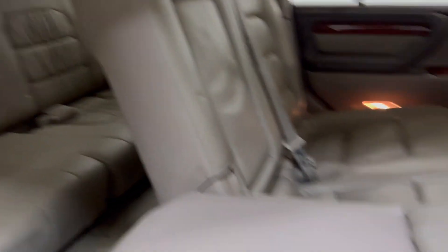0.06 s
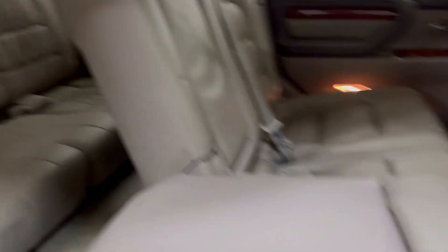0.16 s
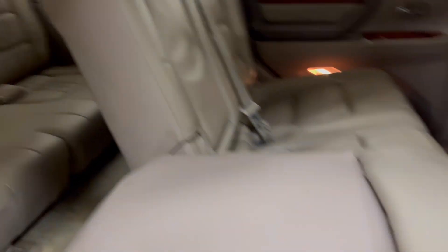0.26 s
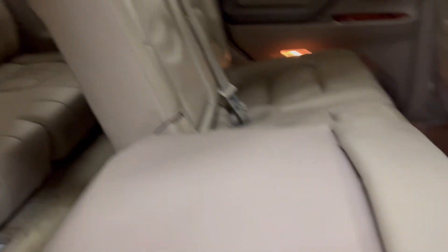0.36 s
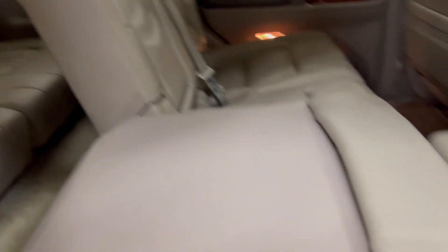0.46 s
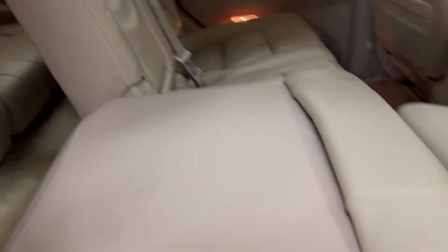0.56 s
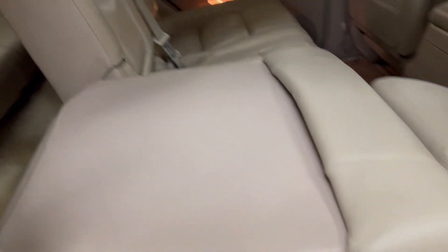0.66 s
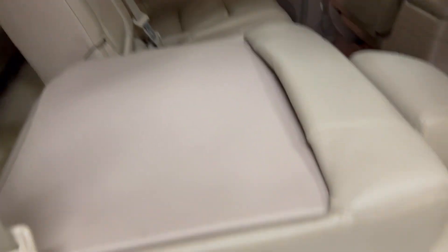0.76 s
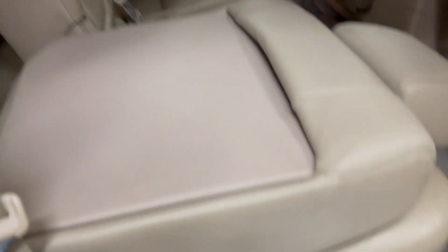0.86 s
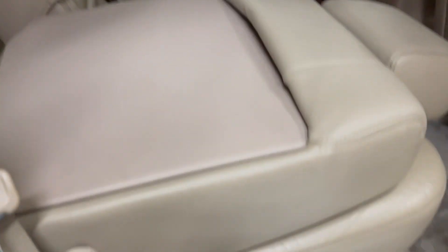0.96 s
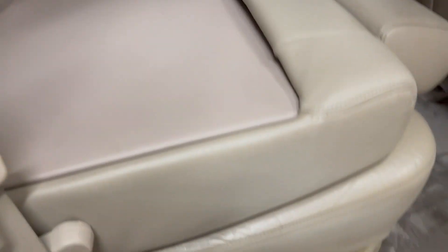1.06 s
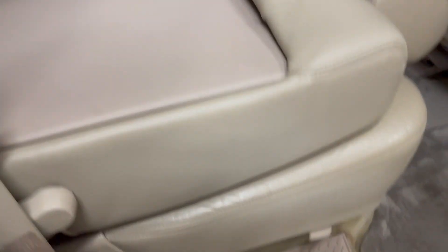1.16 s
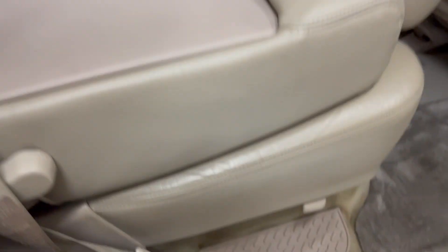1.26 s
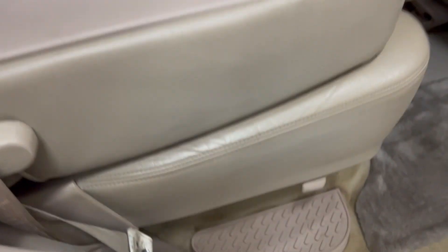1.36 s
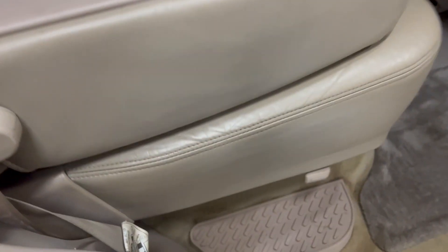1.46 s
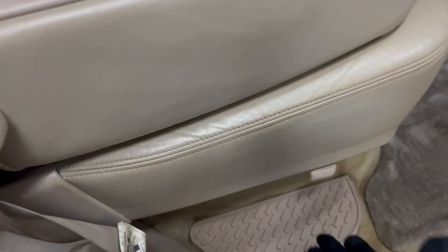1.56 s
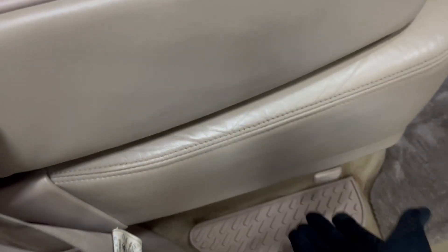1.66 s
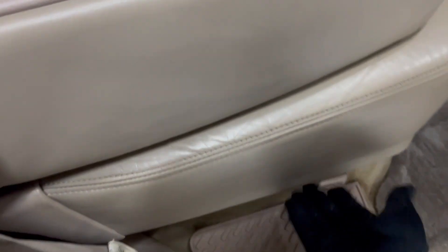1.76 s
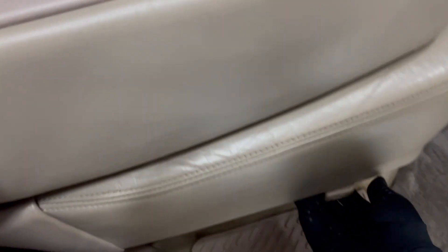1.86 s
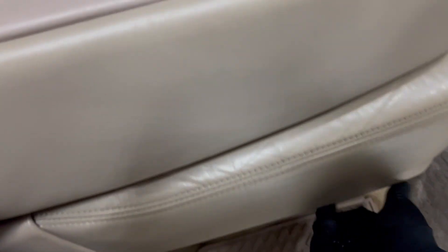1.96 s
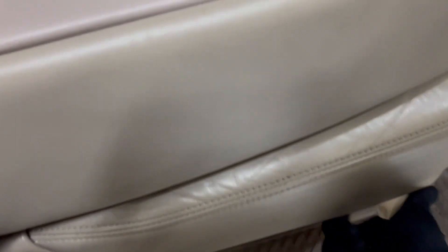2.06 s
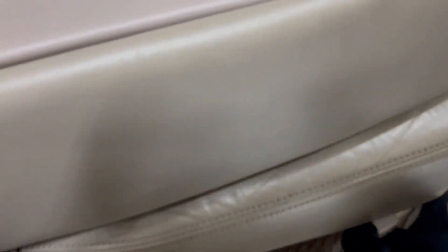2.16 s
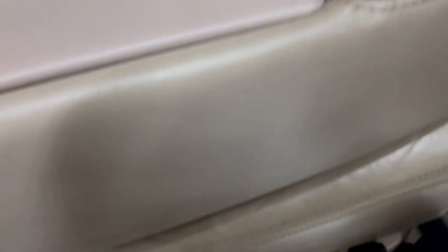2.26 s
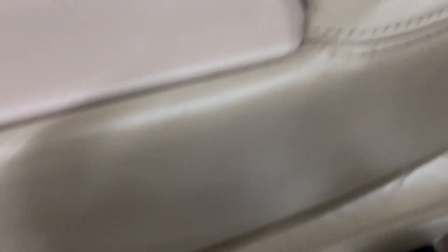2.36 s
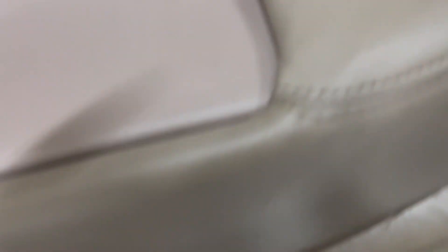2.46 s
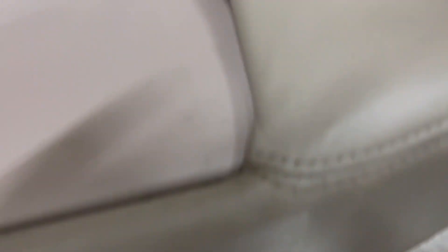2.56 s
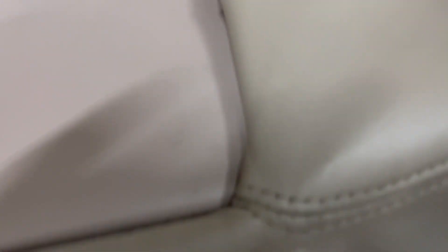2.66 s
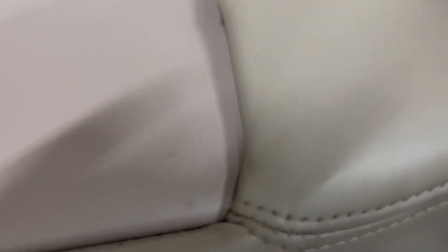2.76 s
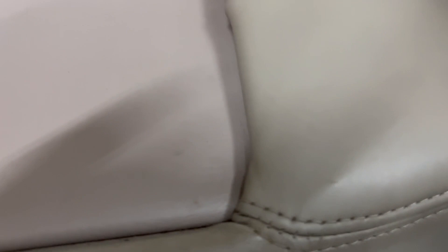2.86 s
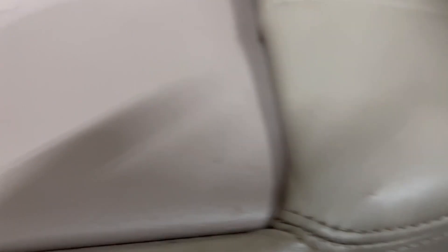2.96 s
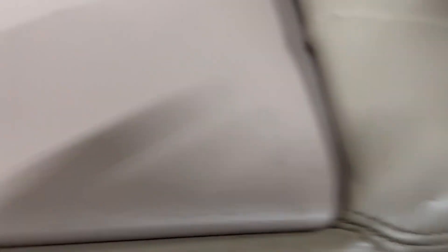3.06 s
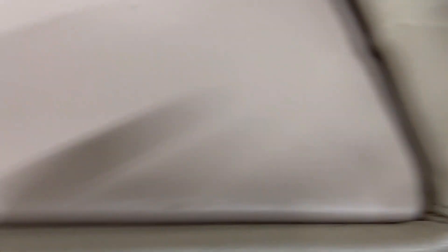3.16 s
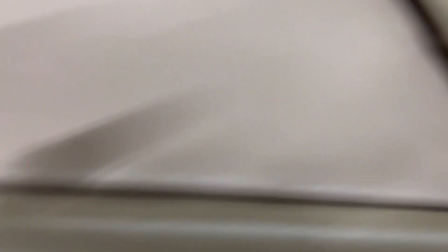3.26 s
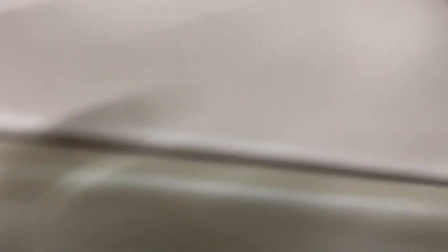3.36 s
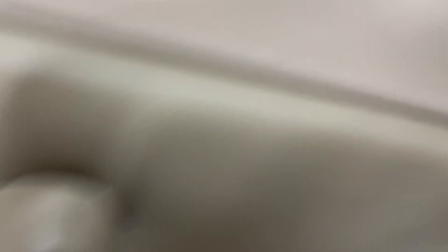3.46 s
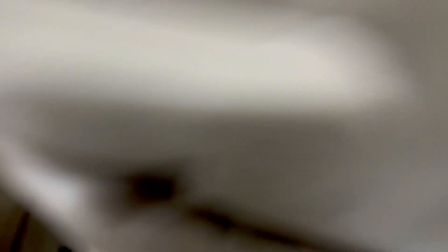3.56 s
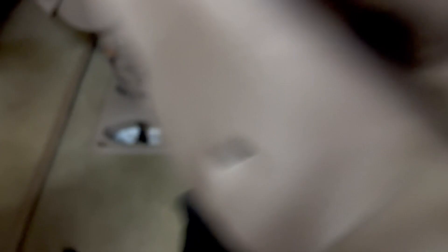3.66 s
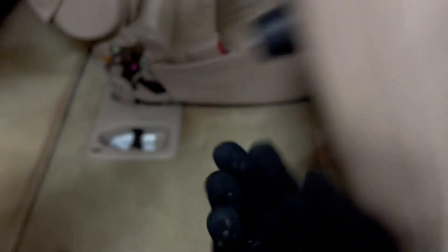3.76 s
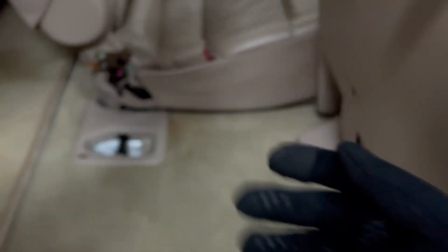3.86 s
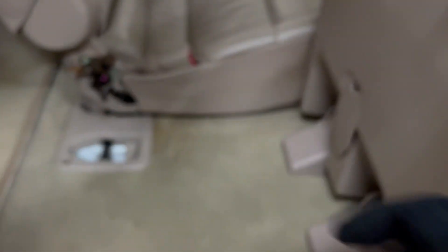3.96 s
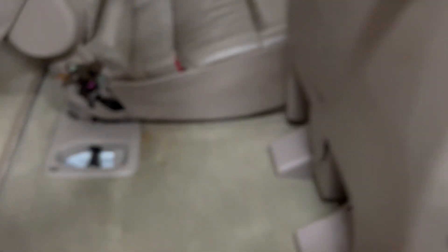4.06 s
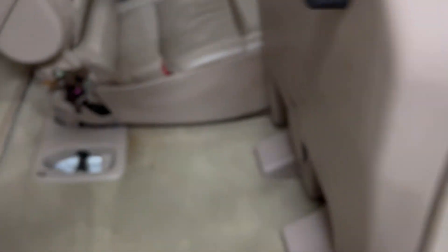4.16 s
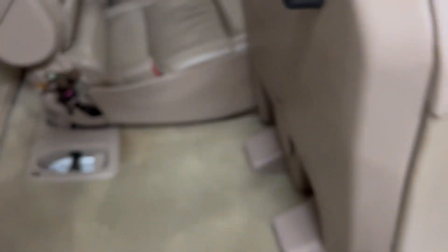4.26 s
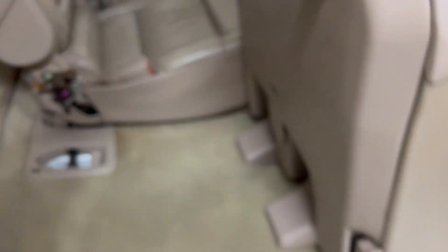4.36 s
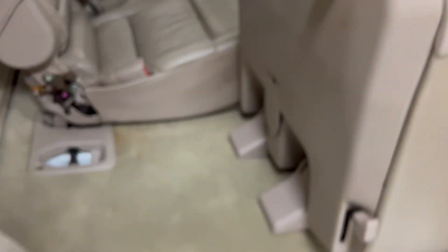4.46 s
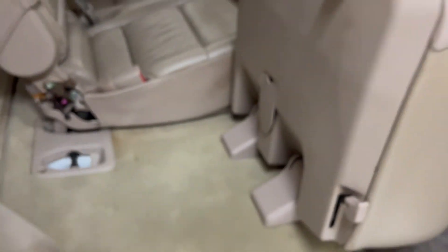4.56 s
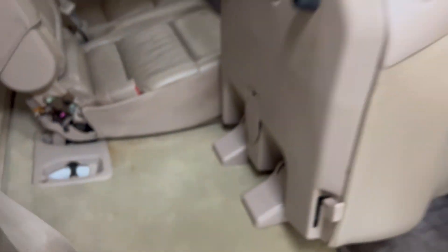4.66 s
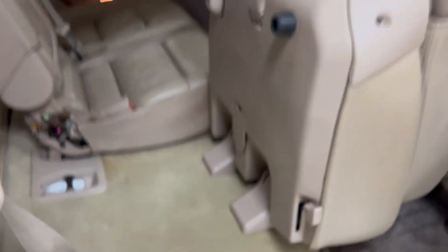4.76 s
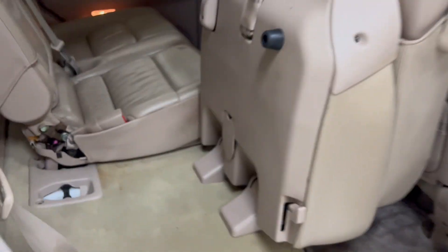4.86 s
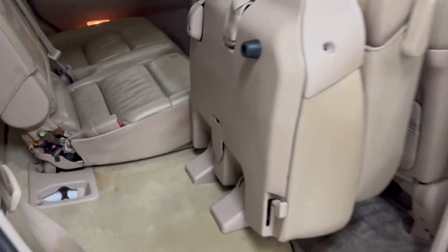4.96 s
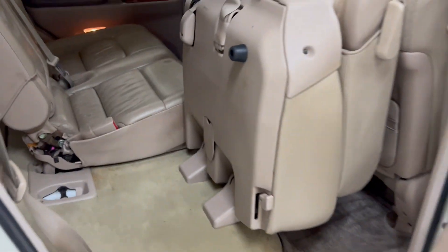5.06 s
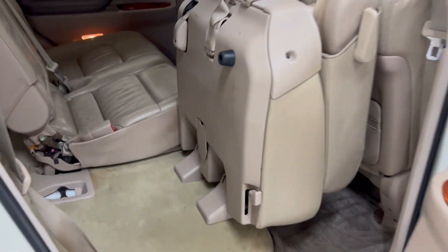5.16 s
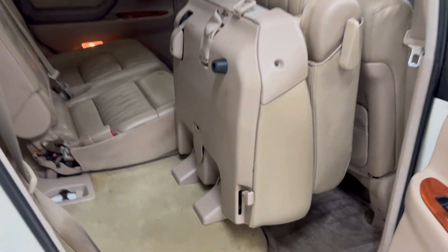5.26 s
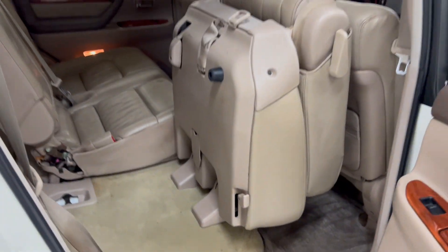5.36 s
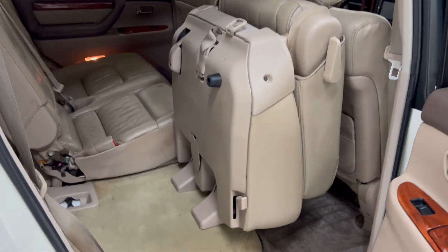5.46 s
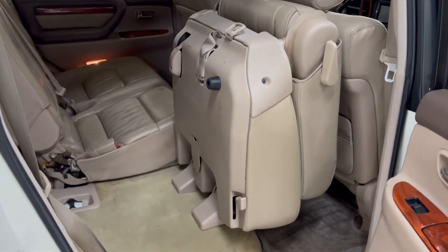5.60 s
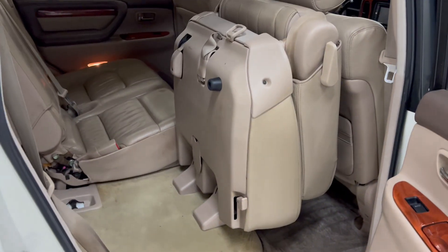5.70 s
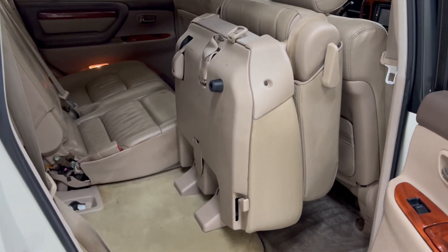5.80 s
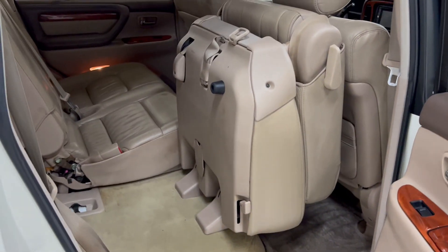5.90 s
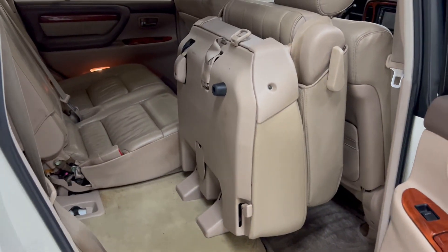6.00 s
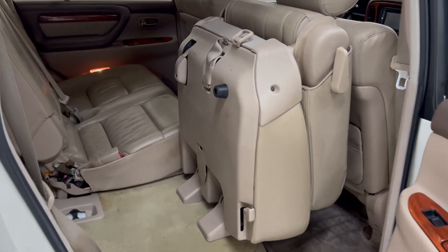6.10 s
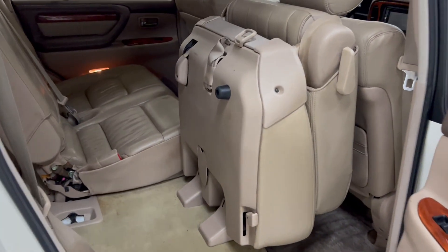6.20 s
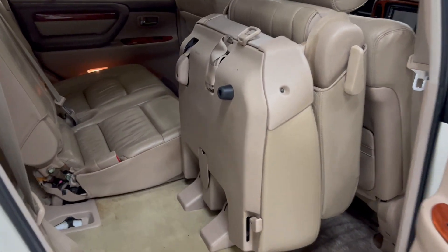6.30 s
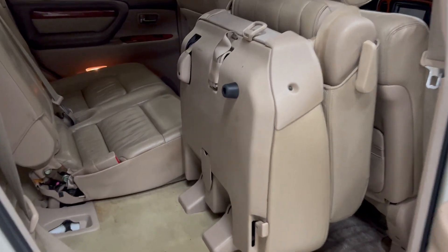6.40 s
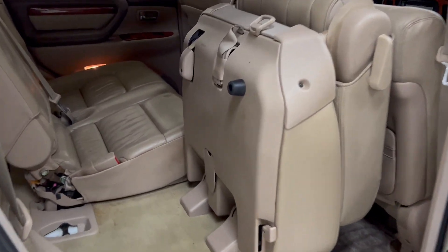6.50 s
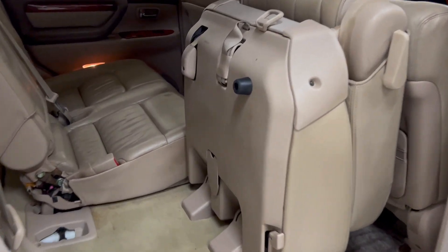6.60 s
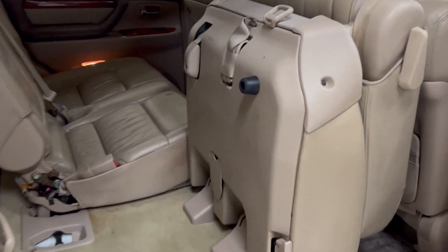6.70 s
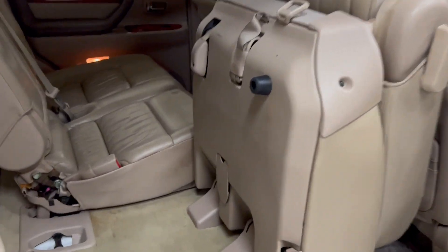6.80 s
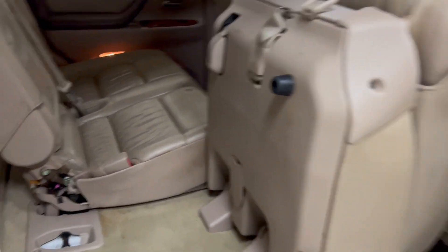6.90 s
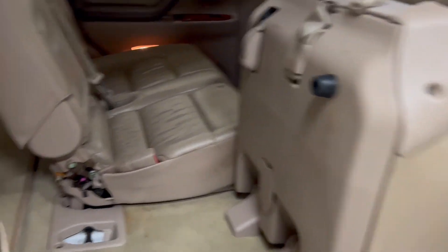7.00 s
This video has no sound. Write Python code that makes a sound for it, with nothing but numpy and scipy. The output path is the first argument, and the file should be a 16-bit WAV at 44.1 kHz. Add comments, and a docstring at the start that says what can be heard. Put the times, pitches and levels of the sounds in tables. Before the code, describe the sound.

Close up in a parked car, leather and a glove rustle while latches click, then a padded seat clunks forward with hard snaps and thuds.

```python
"""Folding a car's rear seat

A rear seat is unlatched and tumbled forward in a parked car, heard from close by through two ports.
Steel latches click as short snaps, noisy rattles and ringing modes; the seat frame thuds on the floor pan.
Leather and a glove rustle as shaped, grainy noise, among short scuffs and faint treble flickers.
The cabin answers with a brief tail of noise, over the low rumble and mains hum of the garage,
which are noise in broad and narrow bands.
"""
import sys
import numpy as np
from scipy import signal
from scipy.fft import rfft, irfft
from scipy.io import wavfile
from scipy.ndimage import uniform_filter1d

SR = 44100
rng = np.random.default_rng(int(sys.argv[2]) if len(sys.argv) > 2 else 0)


def to_wav(sig):
    """Store sig (one row per channel, or 1-D mono) as 16-bit WAV at the path in sys.argv[1].

    Samples outside -1..1 are clipped; the rate is SR.
    """
    pcm = np.clip(np.atleast_2d(sig), -1, 1) * 32767
    pcm = np.round(pcm).astype(np.int16)
    wavfile.write(sys.argv[1], SR, pcm.T)  # frames by channels


N = 310315
FREQ = np.arange(N // 2 + 1) * SR / N + 1e-3  # Hz, kept above zero for the logarithm

# garage rumble, relative colour: (frequency [Hz], level [dB])
GARAGE = [(12, -57), (20, -20.5), (43, -15), (65, 1), (166, -15.5), (239, -30.5), (283, -28.5), (335, -31),
          (386, -36), (470, -45.5), (1090, -36.5), (1410, -49.5), (2700, -39.5), (3280, -64), (16800, -82)]
# hum of lamps and fans: (frequency [Hz], width [Hz], level [dB])
HUM = [(58, 6, -58), (123, 10, -62), (2740, 76, -80.5), (1950, 100, -84.5)]
# likeness of the two sides in noise: (frequency [Hz], likeness [0-1])
ALIKE = [(60, 0.99), (150, 0.93), (300, 1), (700, 0.5), (1500, 0.2), (3000, 0), (6000, 0.1), (8000, 0.4),
         (9400, 0.93)]
# relative colours of leather, glove and shaking frame: (frequency [Hz], level per Hz [dB])
LEATHER = [(150, -39.5), (250, -1), (369, -0.5), (418, 2), (530, -3.5), (792, -8), (887, -6), (1830, -7),
           (2670, -15.5), (5000, -26.5), (6500, -44), (11000, -120)]
GLOVE = [(1470, -34.5), (2500, -9.5), (7950, -7.5), (10100, -12), (12200, -6), (15800, -13), (16800, -61)]
SHUDDER = [(13, -41.5), (22, -9), (70, 6.5), (102, -6.5), (120, 3), (236, -5), (370, -17.5), (416, -26),
           (700, -23.5), (910, -45), (1540, -120)]
# seat in motion: (time [s], leather rustle [dB], glove hiss before brushes [dB])
MOTION = [(0.0, -73, -82), (0.7, -64, -71.5), (1.08, -64, -69), (1.3, -70, -75.5), (1.45, -66.5, -71.5),
          (1.82, -68.5, -74.5), (1.88, -61, -64.5), (2.17, -56.5, -63.5), (2.45, -62.5, -68.5),
          (2.58, -47.5, -59), (2.98, -55, -65), (3.12, -44.5, -58), (3.37, -55, -63), (3.55, -47, -53.5),
          (3.86, -42.5, -51), (3.95, -33.5, -42.5), (4.202, -58, -67.5), (4.5, -53.5, -64.5),
          (4.55, -45.5, -60.5), (4.76, -58, -74), (4.9, -53.5, -68), (5.3, -58, -67), (5.45, -65, -78),
          (5.8, -69.5, -86), (6.2, -69.5, -85), (6.56, -58, -67), (6.78, -66, -77), (7.04, -65, -81.5)]
# the glove brushes the leather and all its hiss rises: (start [s], half released [s], rise [dB])
BRUSHES = [(2.535, 2.585, 8), (2.69, 2.815, 2.5), (3.019, 3.096, 12), (3.92, 3.95, 4.5), (4.365, 4.49, 6),
           (4.522, 4.586, 11.5), (4.6, 4.66, 7.5), (4.828, 4.955, 6), (5.092, 5.195, 6)]
# long slides in which the finest hiss grows: (start [s], end [s], rise [dB])
SLIDES = [(1.9, 2.4, 12.5), (3.3, 4.056, 8)]
# short swells of band noise, low scuffs and faint treble flickers:
# (time [s], length [s], level before fades [dB], centre [Hz], width before widening [Hz])
SCUFFS = [(0.212, 0.047, -73.5, 2460, 3000), (0.414, 0.085, -59, 1630, 1680),
          (0.6, 0.07, -62.5, 1800, 2500), (0.658, 0.09, -64.5, 2290, 1500),
          (0.805, 0.078, -71.5, 8700, 1800), (0.891, 0.27, -62.5, 2330, 905),
          (1.005, 0.15, -66, 7050, 3980), (1.213, 0.11, -77, 8250, 1800), (1.462, .22, -77, 8350, 1800),
          (1.927, 0.15, -56.5, 1240, 710), (2.249, 0.16, -61.5, 1290, 686), (2.54, 0.055, -40, 1400, 1660),
          (2.624, 0.042, -48.5, 770, 784), (2.706, 0.04, -42.5, 1310, 655), (3.081, 0.059, -32.5, 699, 699),
          (3.078, .035, -35, 2822, 2200), (3.115, .035, -39, 1500, 1813), (3.183, 0.13, -54.5, 700, 1220),
          (3.522, 0.21, -50.5, 1280, 1410), (3.712, 0.12, -48.5, 800, 912), (3.884, 0.036, -49, 900, 1180),
          (3.932, 0.039, -31.5, 640, 940), (3.985, 0.034, -40.5, 980, 1400),
          (4.046, 0.025, -42, 3472, 2970), (4.058, 0.047, -46.5, 1170, 1610),
          (4.008, 0.0904, -40.5, 463, 348), (4.324, 0.106, -57.5, 1740, 1800), (4.441, .03, -44, 694, 1200),
          (4.541, 0.056, -46.5, 800, 1200), (4.593, 0.054, -48.5, 1000, 1170),
          (4.832, 0.059, -54.5, 1190, 1480), (4.925, 0.044, -55, 1000, 1180),
          (5.058, 0.15, -58.5, 900, 1500), (6.314, 0.041, -74, 8450, 2000), (6.316, 0.036, -66, 1835, 1583),
          (6.52, 0.093, -56, 1154, 1000), (6.566, 0.063, -55, 990, 600)]
# blows of the seat on hinge and floor:
# (time [s], peak [dB], strongest frequency [Hz], share of the free ring time [ratio])
THUDS = [(1.82, -18, 390, 0.47), (1.827, -21.5, 197, 0.35), (2.193, -30.5, 363, 0.66),
         (2.208, -36, 193, 0.65), (2.543, -19, 172, 0.28), (2.556, -15, 117, 0.38), (2.574, -17, 148, 0.55),
         (2.593, -18.5, 90, 0.65), (2.652, -26, 124, 1), (2.752, -16.5, 194, 0.4),
         (2.774, -22.5, 111, 0.26), (3.075, -13, 312, 0.3), (3.087, -12.5, 143, 0.68),
         (3.115, -31.5, 199, 1), (3.154, -20, 505, 0.21), (3.784, -27.5, 338, 0.83),
         (3.923, -16, 222, 0.91), (3.935, -11.5, 165, 0.99), (3.951, -12.5, 64.4, 0.45),
         (3.996, -15.5, 59.2, 0.37), (4.035, -23.5, 78.1, 0.59), (4.05, -15.5, 127, 0.51),
         (4.092, -20, 68, 0.14), (4.163, -28, 59.2, 0.54), (4.215, -36, 43.1, 1), (4.537, -22, 139, 0.76),
         (4.585, -33, 145, 0.67), (4.616, -26, 75.4, 0.47), (4.681, -36, 67.6, 0.31),
         (4.772, -35.5, 65, 0.6), (4.906, -34, 135, 0.44), (4.948, -34.5, 137, 0.51),
         (5.103, -28.5, 160, 0.48), (5.163, -36, 73.6, 0.84)]
# modes of seat frame and floor pan before each blow varies them:
# (frequency [Hz], level [dB], free time to fall 60 dB [s])
FRAME = [(43.5, -18.5, .4), (61.7, -9.5, 0.24), (86, -3.5, 0.14), (121, -5.5, 0.18), (156, 3, 0.096),
         (195.5, -0.5, 0.087), (255, -2.5, 0.11), (305, -9.5, 0.035), (350.5, 8.5, 0.065),
         (410.2, 3, 0.062), (467, -6.5, .09), (547, -3.5, 0.11)]
# latch and lever clicks: (time [s], body peak before panning [dB], brightest frequency [Hz],
# width over that frequency [ratio], rattle against snap [dB], steel ring against housing [dB],
# treble crack against body [dB], left minus right [dB])
CLICKS = [(0.82, -52, 980, 1.2, -4, -18, -16, -8), (0.902, -45, 695, 0.95, -9, -12, -24, -0.5),
          (1.054, -41, 1050, 0.6, 2, -18, -24.5, -8), (1.293, -45, 830, 0.55, 2, -22, -26, -5),
          (1.334, -44, 900, 0.9, -2, -13, -14.5, -5), (1.818, -21, 1530, 0.84, -3, -29, -5.5, 7),
          (2.15, -38.5, 1200, 0.33, -5.5, -19, -14.5, -1), (2.192, -30.5, 1190, 1.79, -4, -25, -19.5, 2.5),
          (2.442, -44.5, 912, 1.1, -4, -18, -12, -6), (2.461, -47, 2260, 1.2, -3.5, -12, -24.5, 3.5),
          (2.54, -27.5, 1720, 0.57, 0, -10, -20, 1.5), (2.568, -21.5, 646, 1.2, -2.5, -17, -27.5, 2),
          (2.724, -32, 1420, 0.75, -3.5, -12.5, -15.5, -1), (2.751, -13.5, 1300, 1.4, -5, -15, -20.5, 3.5),
          (2.982, -38.5, 1260, 0.79, -4, -11, -22.5, 2), (3.031, -36, 3300, 1.2, 1.5, -9, -3.5, -5.5),
          (3.072, -3, 1982, 1.5, 3.5, -7, -5.5, -2.5), (3.11, -9.5, 1840, 1.6, -1, -11, -5, 0),
          (3.152, -23, 990, 0.42, -3, -15, -29.5, 0.5), (3.21, -33, 2000, 0.7, -4, -12, -20.5, 3.5),
          (3.243, -39, 740, 0.98, -3, -11.5, -21, -1.5), (3.717, -32.5, 707, 1.78, 1, -17, -12, 11.5),
          (3.785, -27, 600, 2.1, 0, -16, -18.5, 11), (3.843, -39.5, 883, 1.4, -2.5, -13, -4, 18.5),
          (3.922, -17.5, 650, 0.604, -5, -9.5, -6, -4), (3.934, -25, 605, 1.3, -26, -14, -12, 5),
          (3.986, -29, 1240, 1.4, -3.5, -12, -22, 4), (4.048, -19.5, 1310, 2.5, -4, -10.5, -13, 3.5),
          (4.45, -9.5, 1184, 0.9, -15, -29.5, -18.5, -9.5), (4.531, -37, 1002, 1.22, -6, -12, -6.5, -0.5),
          (4.542, -34.5, 724, 0.94, -3, -15, -12, -8), (4.583, -29, 799, 0.65, -4, -16, -19.5, -3),
          (4.611, -35, 668, 1.26, -6, -19, -15.5, 1), (4.671, -36, 1370, 0.53, -0.5, -24, -25, -5),
          (4.749, -47, 1600, 1.2, -9, -18, -20, -2), (4.783, -42, 2110, 1.4, -4.5, -5, -33.5, -2.5),
          (4.904, -41, 713, 0.75, -7, -14, -22, -3), (4.945, -36.5, 709, 1, -3, -16, -25.5, -5),
          (5.051, -40, 714, 0.44, -10, -8, -24.5, -3), (5.1, -30.5, 696, 1.8, -5, -13.5, -34, -0.5)]
# modes of the steel latch before each click varies them:
# (frequency [Hz], level [dB], free time to fall 60 dB [s])
LATCH = [(625, -8, .04), (850, -10, .035), (1055, -9, .035), (1376, -5, .04), (1600, -9, .03),
         (1983, 3, .07), (2120, -8, .05), (2624, -7, .04), (3155, -5, .06), (3870, -11, .05),
         (4070, -11, .04), (5090, -14, .03), (6320, -14, .03), (7860, -10, .05)]
# the two ports apart, in the bass and above:
# (frequency [Hz], lead of the left port [half turns], left minus right [dB])
PORTS_BASS = [(150, 0, 1.5)]
PORTS = [(400, 0.44, 2.5), (1070, -0.51, 3), (2050, 0.52, 2), (3510, 0.53, 1.5), (5950, .2, 6.5),
         (7800, 0.42, 1), (9740, -0.79, -3)]
# steps of phase between left and right thin out two treble bands of the sum:
# (frequency [Hz], lead of the left side [half turns], left minus right [dB])
PHASE_STEPS = [(9700, -1, 0), (10750, -1, 0), (11100, -2, 0), (12950, -2, 0), (13250, -3, 0),
               (14350, -3, 0), (14600, -4, 0)]

GARAGE_DB = -51
SWELL_S, SWELL_LENGTH_S, SWELL_DB = 6.22, 0.69, 5  # the rumble swells for a while
FLICKER_DB, FLOOR_SWELL_DB = 2.2, 1.2  # unsteadiness: leather and rumble, rumble only
CABIN_BASS_T60_S, CABIN_FULL_T60_S, CABIN_DB = 0.06, 0.19, -16.5  # t60: time to fall 60 dB
SHUDDER_DB, SWING_DB = -57, 1.5  # shudder at rest, and against the rustle
AFTER_BLOW_DB, AFTER_BLOW_T60_S = -22.5, 0.67  # shudder against a blow
FIBRE_DB = -11.5  # finest hiss against the glove hiss
BRUSH_ATTACK_S, BRUSH_RELEASE_S, BRUSH_FIBRE_SHARE = 0.006, 0.03, 1.3
PUSH_S = 0.0031  # build-up of a padded blow
RATTLE_T60_S = 0.026  # main part of the rattle
RATTLE_APART = 0.45  # rattle that differs between the ports, against the common part
STEEL_SHARE, STEEL_FALL_DB = 0.5, 2.5  # share of free ring time; loss per octave
ECHO_DB = -4  # click sent to the cabin
SETTLE_START_S, SETTLE_END_S = 5.232, 5.452  # faint ticks while the folded seat settles
TICK_DB, TICK_SPREAD_DB, TICK_HZ = -47.5, 3, 1500
TOP_HZ = 15900


def undb(db):
    """Turn decibels into a plain gain."""
    return 10 ** (np.asarray(db) / 20)


def unit(x):
    """Scale to an average strength (RMS) of one."""
    return x / np.sqrt(np.mean(x ** 2))


def peak(x, db):
    """Scale so that the highest peak reaches db."""
    return undb(db) * x / np.max(np.abs(x))


def along(table, order=1):
    """Read one column of a frequency table at every frequency."""
    return np.interp(np.log(FREQ), np.log([row[0] for row in table]), [row[order] for row in table])


def walk(rate):
    """Random levels, rate of them a second, smoothed twice; their spread is near 1."""
    k = int(SR / rate)
    steps = np.repeat(rng.standard_normal(N // k + 1), k)
    return 1.6 * uniform_filter1d(uniform_filter1d(steps, k), k)[:N]


def add(out, s, sound, pan_db=0.):
    """Mix a sound in at s seconds, with the left side pan_db louder than the right."""
    i = int(s * SR)
    out[:, i:i + sound.shape[-1]] += undb([[pan_db / 2], [-pan_db / 2]]) * sound[..., :N - i]


def band(x, hz, width_hz):
    """Let through a resonant band around hz."""
    return signal.lfilter(*signal.iirpeak(hz, hz / max(width_hz, 50), SR), x)


def wash(colour_db, flicker_db, swell_db, grain_db=0., grain_s=.001):
    """Stereo noise in octave bands that swell together and flicker alone, roughened by uneven grains."""
    k = max(int(grain_s * SR), 1)
    grains = undb(grain_db * np.repeat(rng.exponential(size=N // k + 1), k)[:N])
    mid, side = rfft(grains * rng.standard_normal((2, N)))
    alike = np.clip(along(ALIKE), 0, 1)
    opposite = np.array([[1], [-1]])
    pair = undb(colour_db) * (np.sqrt(1 + alike) * mid + np.sqrt(1 - alike) * side * opposite)
    out, swell = 0, swell_db * walk(3.086)
    for octave in range(5, 15):  # centred on 2 ** octave Hz
        window = np.cos(np.pi / 2 * np.clip(np.log2(FREQ) - octave, -1, 1)) ** 2
        out = out + undb(swell + flicker_db * walk(11)) * irfft(pair * window, N)
    return unit(out)


def ring(modes, centre_hz, fall_db, share, detune, chance, size):
    """Ringing modes of a body; those away from centre_hz lose fall_db an octave."""
    t = np.arange(size) / SR
    hz, db, t60 = np.transpose(modes)[:, :, None]
    pitch_chance, level_chance = chance[:2, :len(hz), None]
    hz = hz * (1 + detune * pitch_chance)
    gain = undb(db + 2.5 * level_chance - fall_db * np.abs(np.log2(hz / centre_hz)))
    decay = np.exp(-np.log(1000) * t / (t60 * np.clip(share, .05, 3)))
    build_up = 1 - np.exp(-t * hz / 0.57)  # takes a fraction of a cycle
    return np.sum(gain * decay * build_up * np.sin(2 * np.pi * hz * t), axis=0)


def garage():
    """Low rumble of the building as broad noise, with wavering hum of lamps and fans as narrow noise."""
    swell_db = SWELL_DB * np.exp(-((np.arange(N) / SR - SWELL_S) / SWELL_LENGTH_S) ** 2)
    out = undb(GARAGE_DB + swell_db) * wash(along(GARAGE), FLICKER_DB, FLOOR_SWELL_DB)
    for hz, width_hz, db in HUM:
        line = rfft(rng.standard_normal(N)) / (1 + (2 * (FREQ - hz) / width_hz) ** 2)
        out = out + undb(db) * unit(irfft(line, N))
    return out


def cabin(x):
    """Scattered reflections, different at each port: a bass part dies sooner than a full-range part."""
    t = np.arange(int(.4 * SR)) / SR
    bass, full = rng.standard_normal((2, 2, len(t)))
    bass = signal.sosfilt(signal.butter(2, 900, fs=SR, output="sos"), bass)
    tail = 2.5 * bass * np.exp(-np.log(1000) * t / CABIN_BASS_T60_S)
    tail = tail + full * np.exp(-np.log(1000) * t / CABIN_FULL_T60_S)
    tail = tail * (t > .003)  # a short gap before the first reflection
    tail = signal.sosfilt(signal.butter(2, [300, 7500], "band", fs=SR, output="sos"), tail)
    tail = tail / np.sqrt(np.sum(tail ** 2, axis=1, keepdims=True))
    return undb(CABIN_DB) * signal.fftconvolve(x.mean(axis=0)[None], tail, axes=1)[:, :N]


def upholstery():
    """Leather creaks in dense slips, a glove hisses, the frame shudders as it swings and after blows."""
    t = np.arange(N) / SR
    s, *columns = np.transpose(MOTION)
    rustle_db, hiss_db = (np.interp(t, s, c) for c in columns)
    brush_db = 0
    for start, end, db in BRUSHES:
        rise, release = (t - start) / BRUSH_ATTACK_S, (end - t) / BRUSH_RELEASE_S + .5
        brush_db = brush_db + db * np.clip(np.minimum(rise, release), 0, 1)
    fibre_db = hiss_db + BRUSH_FIBRE_SHARE * brush_db + FIBRE_DB
    for start, end, db in SLIDES:
        fibre_db = fibre_db + db * np.sin(np.pi * np.clip((t - start) / (end - start), 0, 1))

    blows = np.zeros(N)
    for at, db, *_ in THUDS:
        blows[int(at * SR)] += undb(db + AFTER_BLOW_DB) ** 2
    # each blow leaves power that falls 60 dB in the given time
    blows = signal.lfilter([1], [1, -undb(-120 / AFTER_BLOW_T60_S / SR)], blows)
    shaking = np.sqrt(undb(SHUDDER_DB) ** 2 + undb(rustle_db + SWING_DB) ** 2 + blows)

    leather = wash(along(LEATHER), FLICKER_DB, 0.81, grain_db=1.6, grain_s=0.0018)
    glove = rfft(wash(along(GLOVE), 0.8, 1.0, grain_db=1.5, grain_s=0.00075))
    hiss = unit(irfft(glove * (FREQ < 10200), N))
    fibre = unit(irfft(glove * (FREQ >= 10200), N))
    shudder = wash(along(SHUDDER), 2.3, 2.0)
    rubbing = undb(rustle_db) * leather + undb(hiss_db + brush_db) * hiss + undb(fibre_db) * fibre
    return rubbing + shaking * shudder


def scuffs():
    """Short swells of uneven noise through one broad resonance: low scuffs and faint treble flickers."""
    out = np.zeros((2, N))
    chance = rng.standard_normal((len(SCUFFS), 3, 16384))
    for (s, length, db, hz, width_hz), (left, right, size) in zip(SCUFFS, chance):
        n, i = min(int(length * SR), 16384), int(s * SR)
        unevenness = undb(3.6 * np.repeat(size, 96)[:n])
        apart = 0.74 * np.sqrt(max(1 - np.interp(hz, *np.transpose(ALIKE)), 0))
        pair = np.array([left + apart * right, left - apart * right])[:, :n] * unevenness
        sound = unit(band(band(pair, hz, 1.2 * width_hz), hz, 1.2 * width_hz))
        out[:, i:i + n] += undb(db) * signal.windows.tukey(n, .5) * sound
    return out


def frame():
    """Each padded blow builds up for a moment and rings the seat frame and floor pan."""
    out = np.zeros((2, N))
    chance = rng.standard_normal((len(THUDS), 2, 16))
    push = 1 - np.exp(-np.arange(16000) / SR / PUSH_S)
    for (s, db, hz, share), row in zip(THUDS, chance):
        thud = push * ring(FRAME, hz, 13.8, share, 0.072, row, size=16000)
        add(out, s, peak(thud, db))
    return out


def ticks(count):
    """A faint, nearly even run of clicks while the seat settles, as rows like those of CLICKS."""
    when, size, pitch, side = rng.random((count, 4)).T
    s = SETTLE_START_S + (SETTLE_END_S - SETTLE_START_S) * (np.arange(count) + .3 * when) / count
    level_db = TICK_DB + TICK_SPREAD_DB * (2 * size - 1)
    hz = TICK_HZ * 2 ** (pitch - .5)
    return [(a, b, c, 1.6, 0, -15, -11, d) for a, b, c, d in zip(s, level_db, hz, 6.0 * side)]


def latches():
    """A snap and dry rattle in the plastic housing, some ring of the steel latch and a treble crack."""
    out, echo = np.zeros((2, 2, N))
    clicks = list(CLICKS) + ticks(count=8)
    chance = rng.standard_normal((len(clicks), 5, 4096))
    high = signal.butter(2, 3000, "high", fs=SR, output="sos")
    t = np.arange(4096) / SR
    fade = np.exp(-np.log(1000) * t / RATTLE_T60_S)
    contact = (1 - np.exp(-(t / 0.0019) ** 2)) * (fade + .04 * fade ** .3)
    snap = np.exp(-((t - .0014) / .00007) ** 2)
    for (s, db, hz, width, rattle_db, steel_db, crack_db, pan_db), row in zip(clicks, chance):
        # the housing is wide, so each port hears a somewhat different rattle
        rattle = contact * (row[2] + RATTLE_APART * row[4] * np.array([[1], [-1]]))
        force = snap + undb(rattle_db) * rattle
        housing = band(band(force, hz, width * hz), hz, width * hz)
        modes = ring(LATCH, hz, STEEL_FALL_DB, STEEL_SHARE, 0.0079, row, size=4096)
        steel = signal.fftconvolve(modes, force[0])[:4096]
        body = peak(peak(housing, 0) + peak(steel, steel_db), db)
        grit = signal.sosfilt(high, contact * fade ** 0.18 * row[3])
        crack = peak(.4 * grit + band(grit, 8000, 3900), db + crack_db)
        add(out, s, body, pan_db)
        add(out, s, crack)
        add(echo, s, undb(ECHO_DB) * (body + crack))
    return out + cabin(echo)


def scene():
    """Lay the seat and its cabin echoes over the garage."""
    padded = frame() + scuffs()
    return garage() + upholstery() + padded + cabin(padded) + latches()


def record(dry):
    """Left and right differ in phase and level; the deepest bass and the top are cut."""
    table = PORTS_BASS + PORTS + PHASE_STEPS
    difference = undb(along(table, order=2)) * np.exp(1j * np.pi * along(table))
    sides = difference ** np.array([[.5], [-.5]])  # half of it to each side
    heard = irfft(rfft(dry) * sides, N)
    heard = signal.sosfilt(signal.butter(3, 30, "high", fs=SR, output="sos"), heard)
    return signal.sosfilt(signal.ellip(10, .2, 90, TOP_HZ, fs=SR, output="sos"), heard)


dry = scene()
out = record(dry)
to_wav(out)
```